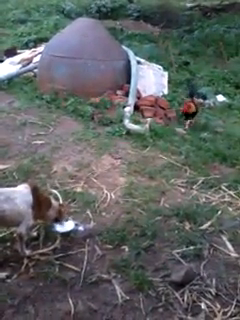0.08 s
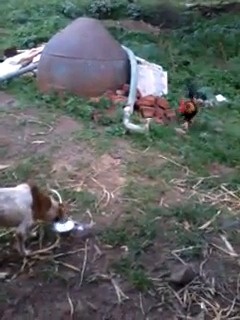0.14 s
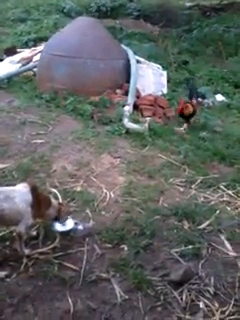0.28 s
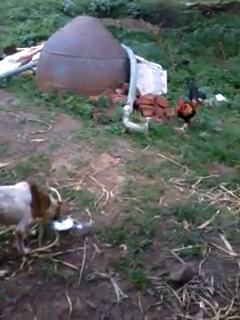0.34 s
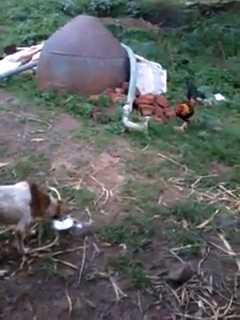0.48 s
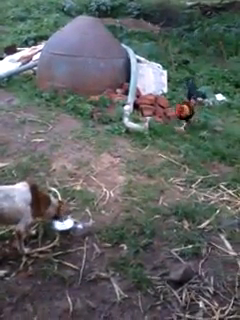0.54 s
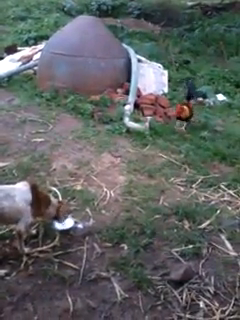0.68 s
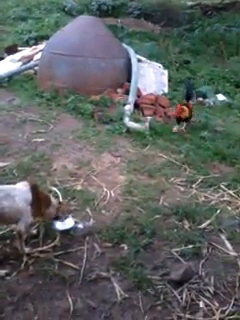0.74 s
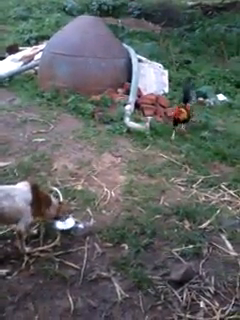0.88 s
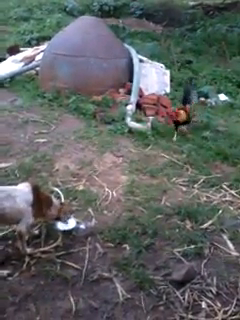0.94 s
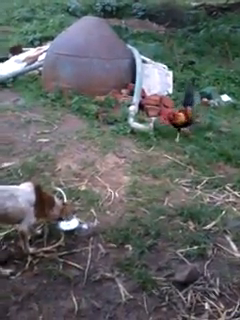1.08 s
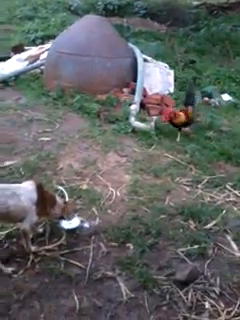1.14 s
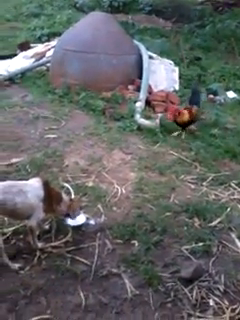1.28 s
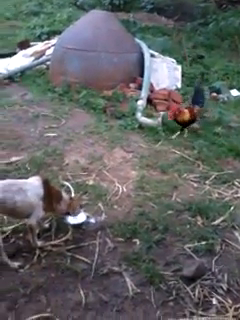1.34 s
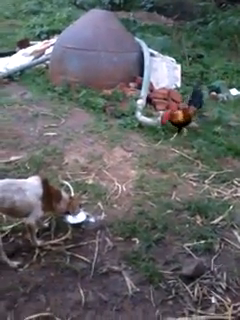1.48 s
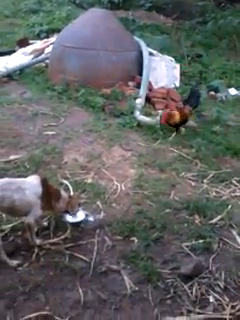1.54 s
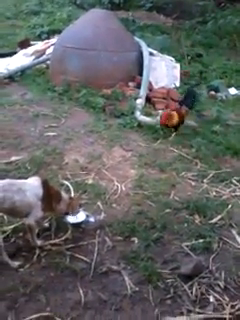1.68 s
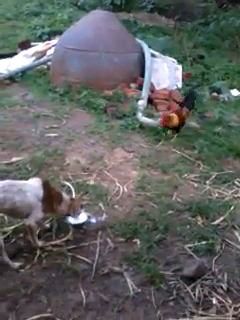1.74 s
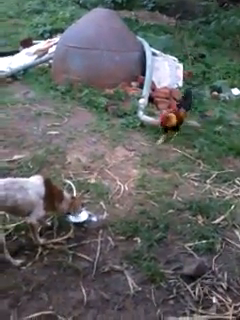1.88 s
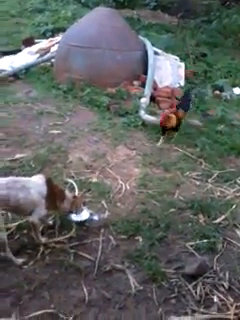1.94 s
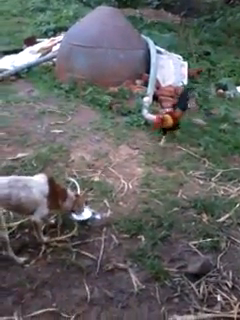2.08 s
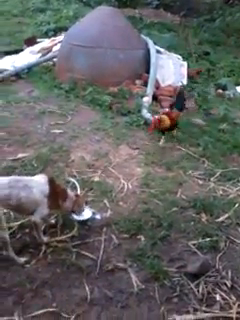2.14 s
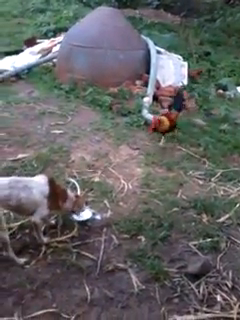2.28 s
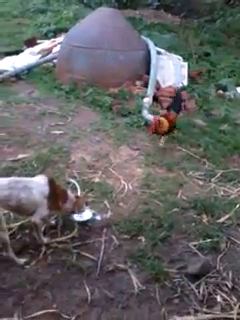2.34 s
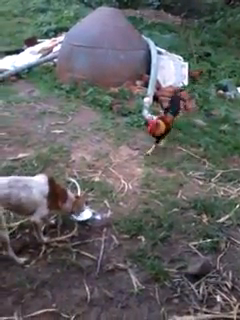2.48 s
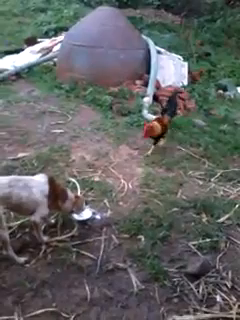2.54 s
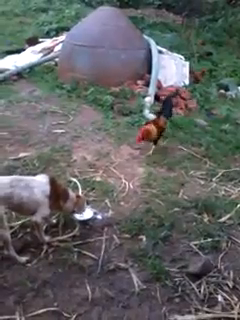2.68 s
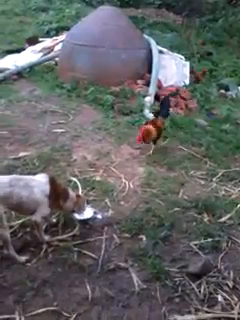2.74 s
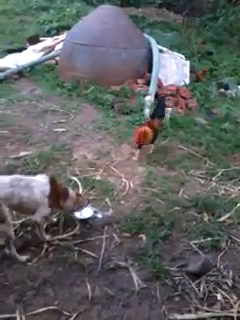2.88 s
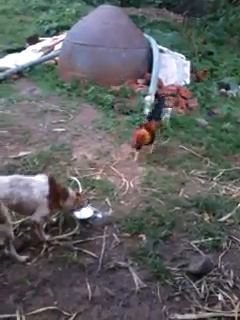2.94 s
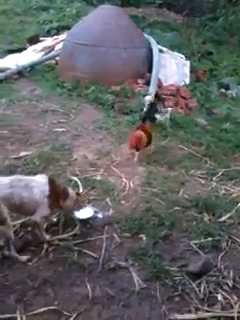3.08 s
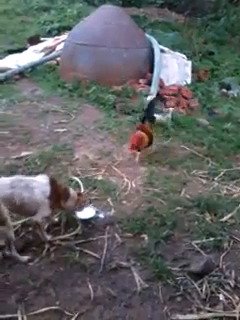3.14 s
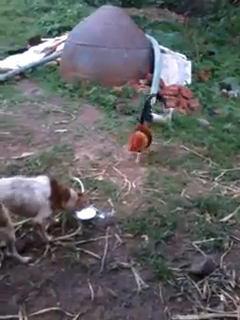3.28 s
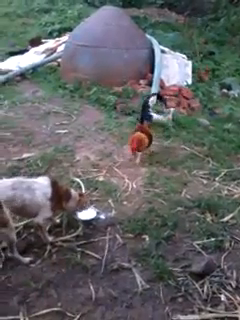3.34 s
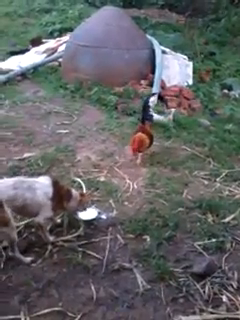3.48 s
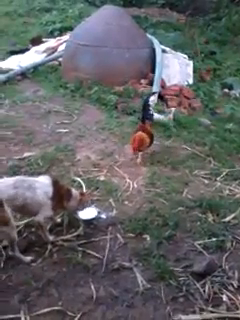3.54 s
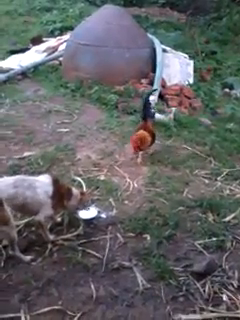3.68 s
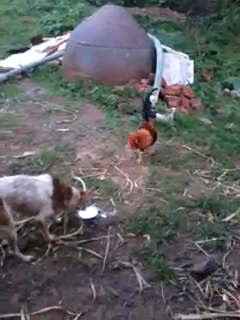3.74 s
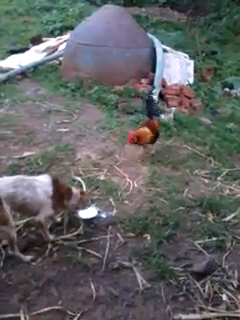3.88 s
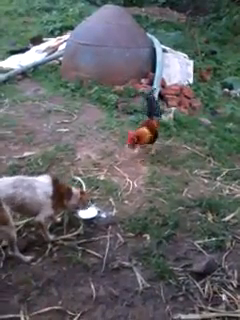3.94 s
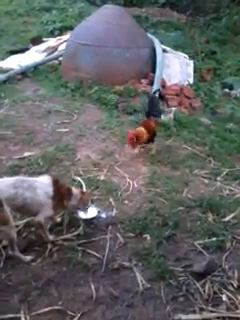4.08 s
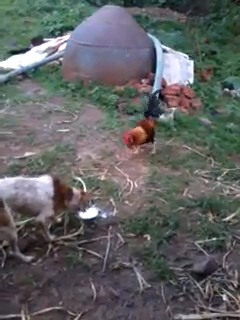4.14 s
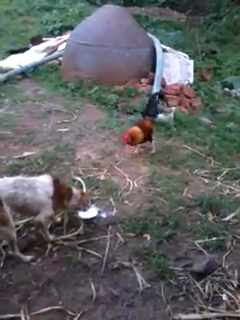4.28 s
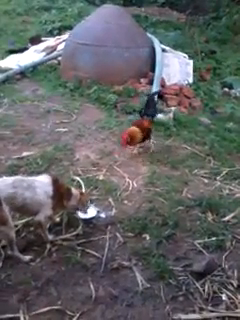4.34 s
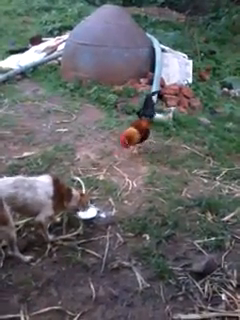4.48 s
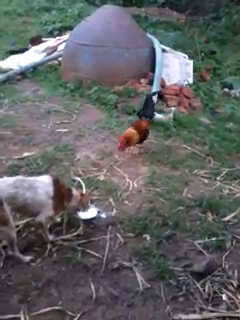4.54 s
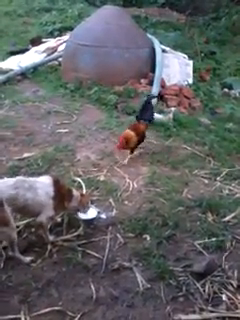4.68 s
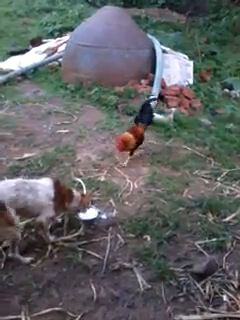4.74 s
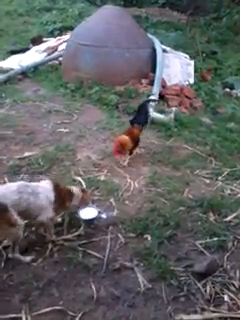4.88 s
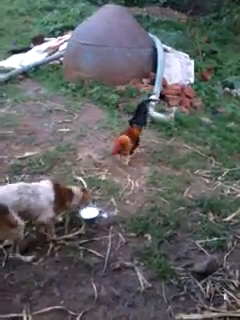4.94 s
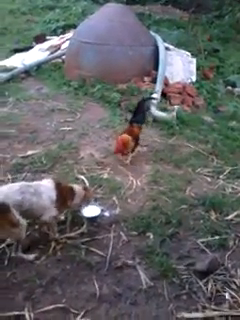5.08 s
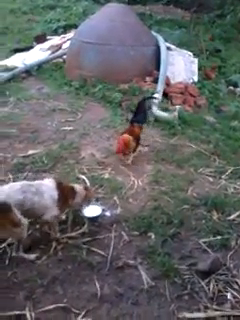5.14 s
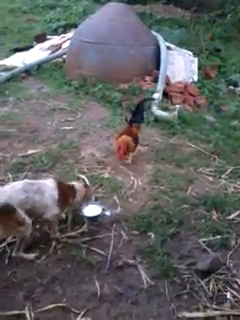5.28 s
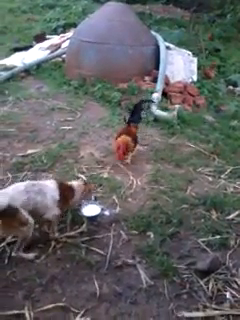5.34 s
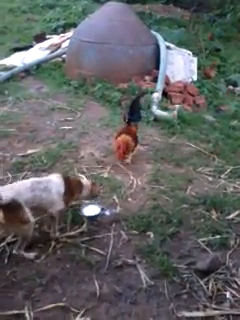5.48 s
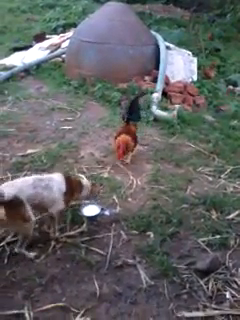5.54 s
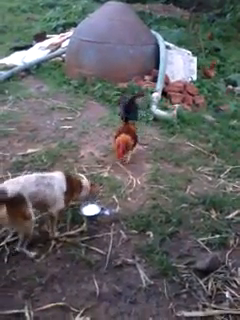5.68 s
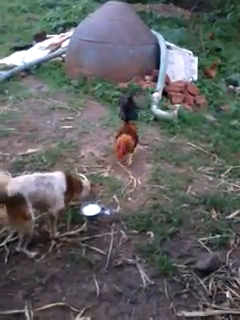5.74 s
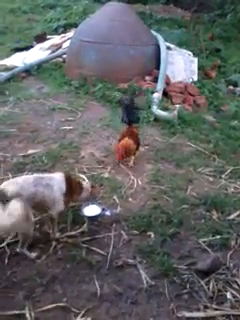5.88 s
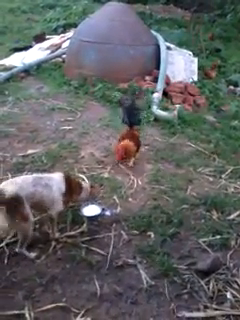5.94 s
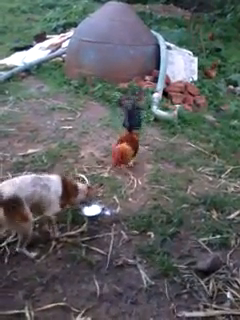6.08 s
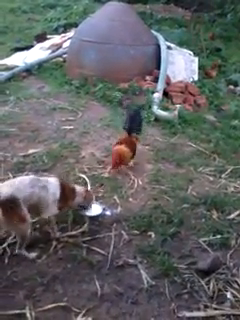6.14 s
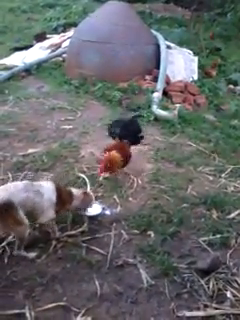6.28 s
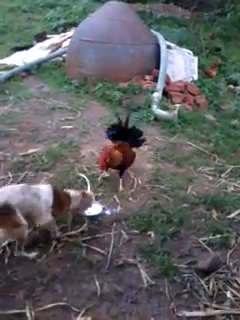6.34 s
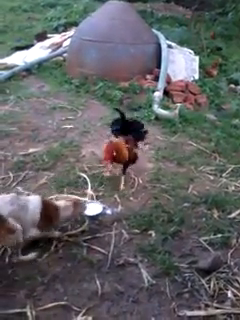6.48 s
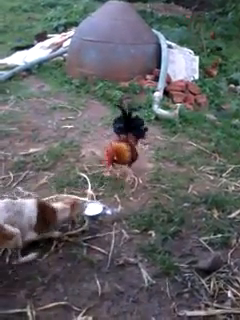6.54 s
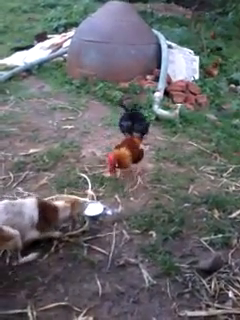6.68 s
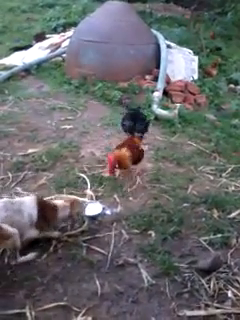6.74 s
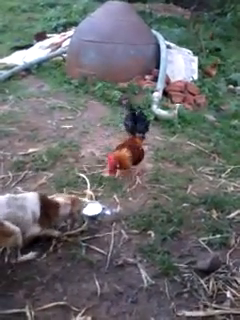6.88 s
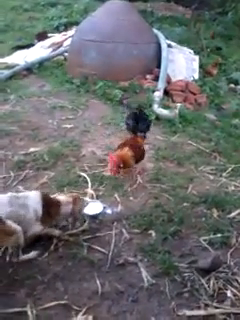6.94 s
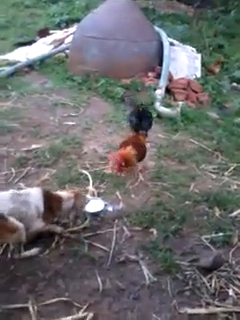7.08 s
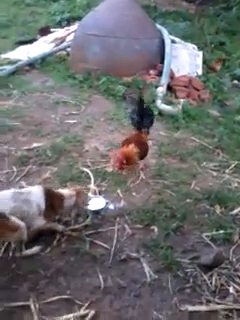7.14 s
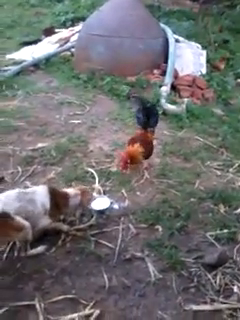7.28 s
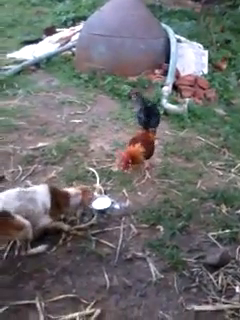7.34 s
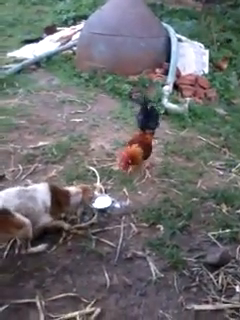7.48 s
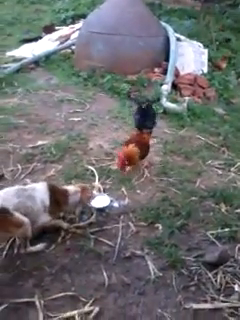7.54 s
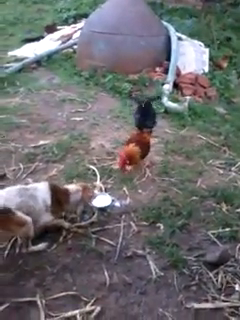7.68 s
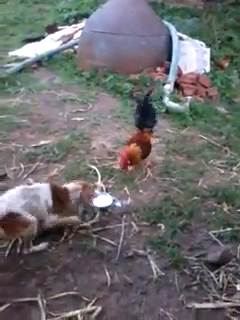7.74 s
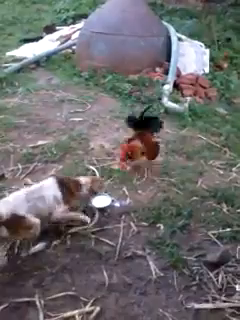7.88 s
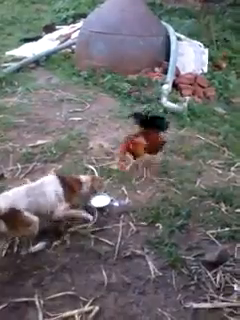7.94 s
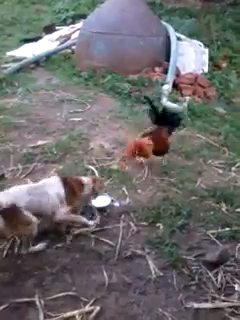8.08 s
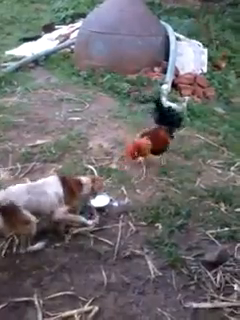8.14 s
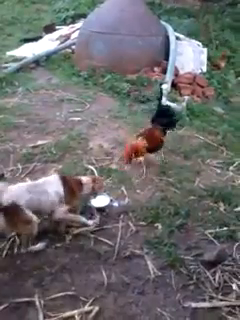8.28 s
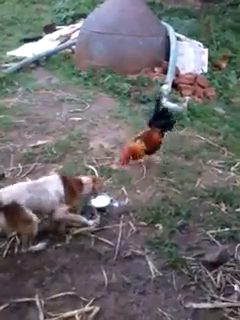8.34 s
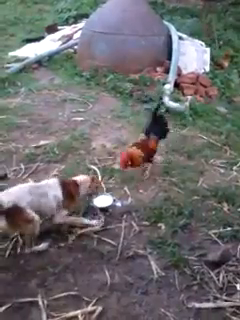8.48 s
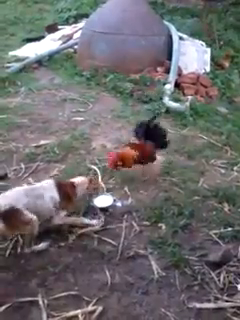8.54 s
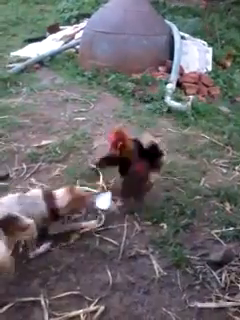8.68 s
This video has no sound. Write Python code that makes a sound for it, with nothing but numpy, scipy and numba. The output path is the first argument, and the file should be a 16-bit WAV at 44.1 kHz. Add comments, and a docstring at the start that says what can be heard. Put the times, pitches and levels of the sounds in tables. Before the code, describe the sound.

A small dog growls in rattling bouts over its food bowl, then gives seven short sharp barks that distort in a quiet open yard.

```python
"""A small dog growls in short rattling bouts, hisses softly, snarls and gives seven sharp barks.
Growls and barks are uneven pulses of the voice, broken up by a rattle and coloured by throat and mouth.
Hisses and the long snarl are noise in moving resonances; crunches are tiny cracks, sharp pulses ring.
A faint hush lies beneath. The open yard answers with short dull echoes and one far one,
and the barks overload the input."""
import sys
import numpy as np
from scipy import signal
from scipy.fft import rfft, irfft
from scipy.io import wavfile
from scipy.ndimage import uniform_filter1d, map_coordinates
from numba import njit

SR = 44100
rng = np.random.default_rng(int(sys.argv[2]) if len(sys.argv) > 2 else 0)


def transcribe(u):
    """Save the signal u as a 16-bit wav file named by the first command-line argument.

    u: samples, shape (n,) or (channels, n), limited to [-1, 1]; the rate is SR.
    q: integer samples, one column per channel.
    """
    v = np.clip(np.atleast_2d(u).T, -1, 1)
    q = np.round(v * 32767).astype(np.int16)
    wavfile.write(sys.argv[1], SR, q)


N = 383669


def from_db(db):
    """Turn decibels into gain."""
    return 10 ** (np.asarray(db) / 20)


def rms_one(x):
    """Scale to an average strength (rms) of 1."""
    return x / np.sqrt(np.mean(x ** 2) + 1e-20)


def evened(x, window_s):
    """Hold the strength (rms) near 1 from moment to moment."""
    power = np.abs(uniform_filter1d(x * x, max(int(window_s * SR), 8)))
    return x / np.sqrt(power + 1e-12)


def cut(x, hz, kind, order=2):
    """Keep what lies below ("low") or above ("high") a frequency."""
    sos = signal.butter(order, min(hz, .45 * SR), kind, fs=SR, output="sos")
    return signal.sosfilt(sos, x + 1e-18)


def add(out, start_s, x):
    """Mix a sound in at its start time, with softened ends."""
    i = max(int(start_s * SR), 0)
    x = x * signal.windows.tukey(len(x), min(1, SR / 200 / len(x)))
    out[i:i + len(x)] += x[:max(N - i, 0)]


def drift(n, rate):
    """Smooth random wandering, built from random points of spread 1, rate of them a second."""
    at = np.arange(n) * rate / SR
    points = rng.standard_normal(int(at[-1]) + 3)
    return map_coordinates(points, [at], order=3, mode="mirror")


def resonate(x, hz, width_hz):
    """One resonance, with a gain of about 1 at its centre."""
    r = np.exp(-np.pi * width_hz / SR)
    feed = np.array([1, 0, -1]) * (1 - r * r) / 2
    return signal.lfilter(feed, [1, -2 * r * np.cos(2 * np.pi * hz / SR), r * r], x)


@njit
def glide(x, hz, width_hz):
    """A resonance whose centre moves."""
    r = np.exp(-np.pi * width_hz / SR)
    y = np.zeros(len(x))
    for i in range(2, len(x)):
        fed = (1 - r * r) / 2 * (x[i] - x[i - 2])
        y[i] = fed + 2 * r * np.cos(2 * np.pi * hz[i] / SR) * y[i - 1] - r * r * y[i - 2]
    return y


def glide_twice(x, hz, width_hz):
    """A moving resonance passed twice, so that less gets through away from its centre."""
    return glide(glide(x, hz, width_hz), hz, width_hz)


def body(x, modes):
    """Resonances side by side, each passed twice so that the valleys between them stay dark."""
    return sum(from_db(db) * resonate(resonate(x, hz, width), hz, width) for hz, width, db in modes)


def air():
    """Still outdoor air: a faint, nearly even hush made of coloured noise."""
    # colour of the hush: f/Hz, level/dB
    hush_colour = [(25, -5), (55, -3), (100, -26), (200, -6.5), (350, 2.5), (600, 2), (1000, 0), (1400, -8),
                   (2600, -9.5), (3300, -14), (7000, -19)]
    hz, db = np.transpose(hush_colour)
    bins = np.maximum(np.arange(N // 2 + 1) * SR / N, 1)
    colour = from_db(np.interp(np.log(bins), np.log(hz), db))
    hush = rms_one(irfft(rfft(rng.standard_normal(N)) * colour, N))
    return from_db(-52.5) * hush * from_db(0.55 * drift(N, 3.1))


def crunches():
    """Dry stalks and food: each crunch is a tight cluster of tiny cracks that builds up and breaks off."""
    # crunches: t/s, peak level/dB, time until it dies away/s, top f/Hz
    crunch_table = [(0.242, -32, 0.0077, 2650), (1.398, -32.5, 0.013, 5100), (1.446, -23, 0.014, 7000),
                    (1.507, -26, 0.013, 7000), (2.191, -38, 0.0042, 4000), (2.209, -19.5, 0.0144, 6860),
                    (3.399, -34, 0.0091, 4950), (4.26, -33, 0.0025, 2630), (4.387, -35.5, 0.004, 2270),
                    (7.3, -28, 0.006, 2830), (7.394, -18, 0.0058, 5130), (8.195, -34, 0.019, 3050),
                    (7.823, -37.5, 0.0012, 3080)]
    # what the cracks ring with: f/Hz, width/Hz, level/dB
    crunch_modes = [(650, 2100, 38.5), (1690, 710, 17), (2360, 820, 30.5), (4820, 3000, -48)]
    cracks_per_s, build_s, die_s = 3500, 0.0068, 0.0019
    out = np.zeros(N)
    t = np.arange(SR // 20) / SR
    for s, peak_db, length_s, top_hz in crunch_table:
        cracks = rng.standard_normal(len(t)) * (rng.random(len(t)) < cracks_per_s / SR)
        cracks *= np.minimum(t / build_s, 1) * np.exp(-np.maximum(t - length_s, 0) / die_s)
        sound = cut(body(cracks, crunch_modes), top_hz, "low", order=4)
        add(out, s - .002, from_db(peak_db) * sound / np.abs(sound).max())
    return out


def sharp_pulses():
    """Single sharp pulses and clicks, several of them strong slaps of the growl, ring briefly."""
    # pulses: t/s, peak level/dB
    pulse_table = [(0.241, -42), (0.764, -40), (1.139, -31.5), (1.452, -28.5), (1.507, -28), (1.853, -19.5),
                   (2.26, -36), (2.298, -36.5), (2.345, -34), (2.449, -29), (3.43, -32), (3.573, -21.5),
                   (3.6, -25), (3.971, -33.5), (4.165, -30.5), (7.146, -29.5), (7.303, -29), (7.395, -15),
                   (7.894, -35.5), (8.279, -25)]
    # what the pulses ring with: f/Hz, width/Hz, level/dB
    pulse_modes = [(614, 306, 9), (941, 110, 8), (2500, 870, -37)]
    pulses = np.zeros(N)
    for s, peak_db in pulse_table:
        pulses[int(s * SR)] = from_db(peak_db)
    one = body(signal.unit_impulse(SR // 20), pulse_modes)
    return body(pulses + 1e-18, pulse_modes) / np.abs(one).max()


def folds(pitch_hz, jitter, shimmer_db, uneven, breath):
    """Vocal folds: unsteady pulses, every third one stronger, with a puff of air in each cycle."""
    n = len(pitch_hz)
    cycles = np.cumsum(pitch_hz * (1 + jitter * drift(n, 350))) / SR
    closing = np.diff(np.floor(cycles), prepend=0)
    strength = from_db(shimmer_db * drift(n, 397.5))
    strength = strength * (1 + uneven * np.cos(2 * np.pi * np.floor(cycles) / 3))
    puffs = rng.standard_normal(n) * (1 + np.cos(2 * np.pi * cycles))
    return rms_one(closing * strength) + breath * rms_one(puffs)


def rattle(n, per_s, scatter, decay_s, depth):
    """Loose throat tissue slaps at uneven intervals; each slap lets a dying burst of voice through."""
    beats = np.cumsum(per_s * np.exp(scatter * drift(n, 44.98))) / SR + rng.random()
    slaps = np.diff(np.floor(beats), prepend=0) * from_db(3 * drift(n, 90))
    bursts = signal.lfilter([1], [1, -np.exp(-1 / (decay_s * SR))], slaps)
    bursts = cut(bursts, 260, "low")  # rounds off the onsets
    depth = np.clip(depth, 0, .98)
    return 1 - depth + depth * bursts


def arch(swell_s, fade_s):
    """A rounded swell and fade: time from its peak, and effort in dB under that peak."""
    depth_db, flatness = 22, 2.3  # depth at the ends; a higher exponent flattens the top
    t = np.arange(-swell_s, fade_s, 1 / SR)
    return t, -depth_db * np.abs(t / np.where(t < 0, swell_s, fade_s)) ** flatness


def growls():
    """A rattling voice hums in the chest while the lips are closed and rasps as they part."""
    # growls: start t/s, swell/s, fade/s, pitch f/Hz, chest level/dB, open-mouth level/dB,
    # jaw resonance f/Hz, rattle (0-1); pitch, levels and jaw are those at the peak
    growl_table = [ (0.41, 0.15, 0.16, 326, -38.5, -43.5, 725, 0.98),
                   (0.905, 0.018, 0.3, 313, -38.5, -50, 770, 1),
                   (1.031, 0.23, 0.083, 320.5, -32.5, -44, 820, 0.86),
                   (1.631, 0.048, 0.14, 302, -40.5, -80, 600, 1),
                   (1.719, .12, 0.14, 315.6, -30, -35, 740, 0.75),
                   (1.839, 0.021, 0.018, 321, -48, -30, 740, 0.65),
                   (1.95, 0.06, 0.034, 321.7, -25.5, -26, 747, 0.37),
                   (2.04, 0.027, 0.039, 320, -53, -42.5, 694, 0.4),
                   (2.123, 0.044, 0.014, 278, -45.5, -46, 590, 0.85),
                   (2.405, 0.046, 0.083, 298.7, -31.5, -33.5, 674, 0.71),
                   (2.731, 0.044, 0.061, 301, -46, -73, 564, 0.78),
                   (3.25, 0.056, 0.088, 213.5, -51, -36, 674, 0.04),
                   (3.456, 0.028, 0.16, 292, -41, -50, 553, 1),
                   (3.535, 0.024, 0.026, 300, -33, -36.5, 560, 0.7),
                   (3.54, 0.073, 0.15, 325.3, -33, -27.5, 694, 0.97),
                   (3.657, 0.022, 0.06, 313.3, -31, -41, 680, 0.3),
                   (3.74, 0.068, 0.029, 285, -35, -35, 583, 1),
                   (3.859, 0.036, 0.079, 200.3, -43, -42, 535, 0.5),
                   (3.97, 0.047, 0.11, 303, -39.5, -49.5, 560, 0.92),
                   (4.114, 0.027, 0.067, 325, -36, -54, 573, 0.34),
                   (4.256, 0.034, 0.14, 315.3, -33, -44.5, 770, 0.67),
                   (4.385, 0.026, 0.049, 326, -42, -80, 560, 0.38),
                   (4.478, 0.035, 0.043, 341, -37.5, -49.5, 520, 1),
                   (4.586, 0.037, 0.044, 252, -43, -44.5, 820, 0.82),
                   (5.20, .056, 0.088, 191.4, -50, -39, 576, 0.4),
                   (5.81, 0.066, 0.063, 180.8, -50, -39.5, 707, 0.72),
                   (6.78, 0.047, 0.21, 323.2, -34, -28.5, 680, 0.98),
                   (7.055, 0.022, 0.05, 298, -35, -49, 520, 1),
                   (7.297, .025, .07, 300.4, -38, -32, 563, 0.96),
                   (7.31, .12, 0.086, 346, -29, -25.5, 660, 0.92),
                   (7.45, 0.0416, 0.169, 306.4, -31.5, -46, 557, 0.57),
                   (7.72, 0.017, 0.19, 356.4, -46, -56, 558, 0.52),
                   (8.264, 0.028, 0.088, 303.5, -33.5, -30, 623, 0.88),
                   (8.32, 0.033, 0.068, 343, -30.5, -42, 527, 0.66),
                   (8.385, 0.048, 0.071, 240.4, -40.5, -31.5, 484, 0.27),
                   (8.426, 0.059, 0.1, 351.5, -29, -29.5, 650, 0.75),
                   (8.50, 0.088, .06, 337, -28, -25, 715, 0.49)]
    # resonances of the chest, the mouth, and faint ones between the teeth: f/Hz, width/Hz, level/dB
    chest_modes = [(266, 220, 0)]
    mouth_modes = [(720, 420, -12.5), (964, 240, -9.5)]
    teeth_modes = [(1770, 270, -26.5), (2460, 710, -31)]
    # effort opens the mouth (dB per dB) and lifts the pitch and the jaw resonance
    mouth_follows, pitch_hz_per_db, jaw_hz_per_db = 1.17, 2.5, 6.5
    sag_hz_per_s = 120  # the pitch sinks as the breath runs out
    out = np.zeros(N)
    for start, swell_s, fade_s, top_hz, top_chest_db, top_mouth_db, open_hz, rough in growl_table:
        t, effort_db = arch(swell_s, fade_s)
        n = len(t)
        pitch_hz = top_hz + pitch_hz_per_db * effort_db - sag_hz_per_s * t
        pitch_hz = pitch_hz * (1 + .065 * drift(n, 28))
        chest_db = top_chest_db + effort_db
        mouth_db = top_mouth_db + mouth_follows * effort_db
        tone = folds(pitch_hz, jitter=.09 * rough, shimmer_db=3 * rough,
                     uneven=.6 * rough, breath=.35 * rough)
        slap_depth = .95 * np.sqrt(np.clip(rough, 0, 1))
        slaps = rattle(n, per_s=75, scatter=.3, decay_s=.005, depth=slap_depth)
        slapped = tone * slaps
        # the chest passes the basic tone, throbbing with each slap, and the low part of the rattle
        hum_hz = pitch_hz * (1 + .12 * rough * drift(n, 110))
        hum = np.sin(2 * np.pi * np.cumsum(hum_hz) / SR) * rms_one(slaps + .35)
        rumble = evened(body(slapped, chest_modes), window_s=0.034)
        chest = cut(.95 * rough * rumble + hum, 135, "high", order=4)
        chest = cut(chest, 620, "low", order=4)
        # the jaw drops as the growl swells, lifting the lowest mouth resonance
        jaw_hz = (open_hz + jaw_hz_per_db * effort_db) * np.exp(.06 * drift(n, 25))
        mouth = glide_twice(slapped, jaw_hz, 220) + body(slapped, mouth_modes)
        mouth = cut(cut(mouth, 410, "high", order=4), 1012, "low", order=8)
        mouth = mouth + body(slapped, teeth_modes)
        voice = from_db(chest_db) * evened(chest, window_s=0.027)
        voice = voice + from_db(mouth_db) * evened(mouth, window_s=0.019)
        add(out, start, voice)
    return out


def soft_hisses():
    """Soft hisses: breaths, airy edges of growls and a faint ring after a bark, all resonant noise."""
    # hisses: start t/s, swell/s, fade/s, peak resonance f/Hz, peak level/dB, rush level over hiss/dB
    hiss_table = [ (0.73, 0.025, 0.04, 1365, -55, 10.5), (1.10, 0.052, 0.19, 2480, -59.5, -11),
                  (2.06, 0.046, 0.024, 2670, -49.5, 3.5), (2.467, 0.044, 0.0099, 2430, -48.5, -16),
                  (2.585, 0.048, 0.024, 2480, -52.5, 5), (2.66, 0.039, 0.065, 2480, -58.5, 11),
                  (3.23, 0.069, 0.088, 2270, -53, 14), (3.869, 0.036, 0.051, 2900, -57, 7),
                  (4.52, 0.082, 0.081, 2610, -57.5, 13), (5.161, 0.048, 0.11, 2290, -49.5, 4.5),
                  (5.23, 0.06, 0.19, 1900, -59, -7), (5.701, 0.084, 0.17, 2640, -48, 12),
                  (6.40, 0.058, 0.11, 2760, -51.5, 7), (7.019, 0.038, 0.058, 2290, -50, 6),
                  (8.109, 0.043, 0.21, 2200, -46, 8)]
    hz_per_db = 19.5  # the resonance rises and falls with the level
    out = np.zeros(N)
    for start, swell_s, fade_s, top_hz, level_db, rush_db in hiss_table:
        t, swell_db = arch(swell_s, fade_s)
        hz = top_hz + hz_per_db * swell_db
        noise = rng.standard_normal(len(t)) * from_db(2.5 * drift(len(t), 120))
        # a main band, a weaker one an octave up, and a dull rush
        whistle = glide_twice(noise, hz, 420)
        hiss = whistle + from_db(-19.5) * glide(noise, 2 * hz, 800)
        rush = body(noise, [(490, 580, -5.5), (990, 150, -8.0)])
        mix = rms_one(hiss) + from_db(rush_db) * rms_one(rush)
        add(out, start, from_db(level_db + swell_db) * mix)
    return out


def bark_gesture(attack_s, hold_s, release_s):
    """Effort, dulling and muffling through one bark, all in dB."""
    # effort rises, sags slowly from the hold on, and falls in the release
    rise_db, sag_db_per_s, fall_db = 46, 37.5, 27
    rise_curve, fall_curve = 3.54, 0.7  # exponents: both start fast and then ease off
    # the upper resonances are weaker at the bark's ends and also follow effort (dB per dB)
    dull_ends_db, brightness_follows = 7.5, 0.48
    muffle_db = 17  # reached at the end of the release as the jaw closes
    t = np.arange(0, attack_s + hold_s + release_s, 1 / SR)
    opening = np.maximum(1 - t / attack_s, 0)
    held_s = np.maximum(t - attack_s, 0)
    released = (np.maximum(held_s - hold_s, 0) / release_s) ** fall_curve
    effort_db = -rise_db * opening ** rise_curve - sag_db_per_s * held_s - fall_db * released
    middle = np.sin(np.pi * np.minimum(t / (attack_s + hold_s + release_s / 2), 1))
    dull_db = dull_ends_db * (1 - middle) - brightness_follows * effort_db
    return effort_db, dull_db, muffle_db * released


def wandering(x, hz, width_hz, db):
    """A throat resonance whose centre never holds still."""
    centre_hz = hz * np.exp(0.05 * drift(len(x), 52.3))
    return from_db(db) * glide_twice(x, centre_hz, width_hz)


def dip(x, hz, width_hz):
    """The throat's side cavities swallow a narrow band."""
    return signal.lfilter(*signal.iirnotch(hz, hz / width_hz, fs=SR), x)


def barks():
    """A clear voice and a ragged one sound together through a throat whose resonances follow the jaw."""
    # barks: start t/s, attack/s, hold/s, release/s, level/dB, brightness/dB, harshness (0-1)
    bark_table = [ (2.987, 0.046, 0.044, 0.069, -1, -5.5, 0.67), (4.885, .046, 0.032, 0.1, 0, 0.5, 0.53),
                  (5.505, 0.026, 0.08, 0.084, 1.5, 3, .9), (6.144, 0.066, 0.042, .12, 0.5, 6, 0.72),
                  (6.725, .04, 0.018, 0.097, -5.5, -6.5, 0.57),
                  (7.978, 0.021, 0.033, 0.089, -1, 19.5, 0.78),
                  (8.566, 0.058, 0.0036, 0.173, -6.5, 5, 0.76)]
    # the voice scoops, jumps and sinks while the jaw moves: t/s, pitch f/Hz, jaw resonance f/Hz
    voice_path = [ (2.985, 341, 400), (3.001, 504.8, 525), (3.035, 712.2, 708), (3.044, 530.4, 703),
                  (3.069, 544.4, 680), (3.089, 584, 580), (3.13, 482, 560), (4.885, 371.6, 750),
                  (4.908, 448.9, 835), (4.923, 674.7, 690), (4.94, 574, 618), (4.975, 518.2, 546),
                  (5.031, 534, 563), (5.504, 870.7, 875), (5.538, 829.5, 854), (5.547, 573.3, 775),
                  (5.566, 595, 842), (5.577, 781.7, 853), (5.607, 731, 738), (5.66, 700, 680),
                  (6.15, 359, 700), (6.179, 501.8, 877), (6.186, 781, 792), (6.206, 760, 795),
                  (6.214, 555, 717), (6.245, 551.4, 600), (6.289, 512, 518), (6.726, 311.6, 490),
                  (6.758, 428.3, 650), (6.781, 358.2, 694), (6.85, 329, 637), (7.981, 815.5, 810),
                  (7.993, 903, 895), (8.035, 843.4, 880), (8.046, 525, 820), (8.11, 493, 587),
                  (8.565, 329, 820), (8.607, 362.2, 698), (8.65, 301.6, 550), (8.70, 310, 600)]
    # upper resonances of the open throat: f/Hz, width/Hz, level/dB
    throat_modes = [(1008.5, 164, -9.5), (1634, 355, -17), (2373, 450, -22), (2927, 300, -30),
                    (4590, 1000, -38)]
    # instants when the voice cracks up into its upper resonances: t/s, half length/s, lift/dB
    shriek_table = [(3.037, .008, 6), (5.525, 0.0054, 9.5), (5.597, 0.011, 5.5), (5.625, 0.0068, 3),
                    (6.246, 0.013, 5.5), (6.754, 0.0053, 10), (8.003, 0.0024, 10), (8.025, 0.0032, 10),
                    (8.037, 0.0034, 9), (8.608, .006, 2)]
    # the ragged voice keeps one steady middle pitch and takes over as the clear one fades in the release
    ragged_hz, ragged_gain, clear_fade_db = 520, 1.45, -6
    jaw_middle_hz, throat_follows = 757, 0.22  # the throat follows the jaw about its middle (exponent)
    # the balance of low and high resonances wanders; harshness scales how far
    break_db, breaks_per_s = 5, 131.2
    rasp_db = -38.5  # against the voice in the lowest resonances, before effort changes it
    out = np.zeros(N)
    s, *controls = np.transpose(voice_path)
    for start, attack_s, hold_s, release_s, level_db, bright_db, harsh in bark_table:
        effort_db, dull_db, muffle_db = bark_gesture(attack_s, hold_s, release_s)
        n = len(effort_db)
        t = start + np.arange(n) / SR
        pitch_hz, jaw_hz = [np.interp(t, s, control) for control in controls]
        clear = folds(pitch_hz, jitter=.036, shimmer_db=3, uneven=.3, breath=0)
        ragged = folds(np.full(n, ragged_hz), jitter=.13, shimmer_db=4, uneven=.8, breath=.6)
        fading = np.clip((t - start - attack_s - hold_s) / release_s, 0, 1)
        source = from_db(clear_fade_db * fading) * clear
        source = source + ragged_gain * np.clip(harsh, .4, 1) * ragged
        grain = rattle(n, per_s=130, scatter=.3, decay_s=.005, depth=.6)

        jaw = glide(glide(source, jaw_hz, 340), jaw_hz, 300) + body(source, [(524, 124, -9.5)])
        stretch = (jaw_hz / jaw_middle_hz) ** throat_follows
        second, third, *upper = [wandering(source, hz * stretch, width_hz, db)
                                 for hz, width_hz, db in throat_modes]
        lift_db = harsh * break_db * drift(n, breaks_per_s)
        for at, half_s, db in shriek_table:
            lift_db = lift_db + db * np.exp(-((t - at) / half_s) ** 2)
        # turbulent air rasps along with the effort
        turbulence = rms_one(cut(rng.standard_normal(n), 5000, "low"))
        rasp = from_db(rasp_db) * np.std(jaw) * from_db(effort_db / 2) * turbulence
        # the closing jaw muffles the second resonance fully and the highest ones half as much
        high = third + from_db(-muffle_db / 2) * sum(upper)
        high = from_db(bright_db - dull_db + lift_db) * high
        voice = jaw + from_db(-muffle_db) * second + high + rasp
        voice = cut(evened(voice, window_s=0.0053) * grain, 299, "high", order=4)
        voice = dip(voice, hz=1308, width_hz=232)
        add(out, start, from_db(level_db + effort_db) * evened(voice, window_s=.02))
    return out


def long_snarl():
    """A long airy whistle past the teeth, with a fainter one near the octave and a dull throat rush."""
    # the resonance mostly climbs as the lips draw back: t/s, resonance f/Hz, whistle level/dB
    snarl_path = [(6.84, 1900, -71), (6.951, 1800, -49), (7.03, 1850, -54), (7.13, 1790, -56),
                  (7.17, 1900, -47.5), (7.20, 2000, -45), (7.26, 2100, -45), (7.30, 2100, -45.5),
                  (7.34, 2170, -38.5), (7.44, 2200, -45), (7.49, 2060, -69)]
    s, hz, db = np.transpose(snarl_path)
    t = np.arange(s[0], s[-1], 1 / SR)
    centre_hz = np.interp(t, s, hz) * (1 + .015 * drift(len(t), 30))
    breath = rng.standard_normal(len(t)) * from_db(1.5 * drift(len(t), 70))
    whistle = rms_one(glide_twice(breath, centre_hz, 380))
    octave = rms_one(glide_twice(breath, 1.92 * centre_hz, 850))
    rush = rms_one(body(breath, [(550, 360, -4), (977, 140, -3.5)]))
    mix = whistle + from_db(-13.5) * octave + from_db(1.0) * rush
    out = np.zeros(N)
    add(out, s[0], from_db(np.interp(t, s, db)) * mix)
    return out


def yard(x):
    """Ground, near walls and far trees scatter the sound in dull, dying showers of echoes."""
    # echo showers: delay/s, time to fall by 60 dB/s, level before dulling/dB, top f/Hz
    echo_table = [(.004, 0.053, -13, 3620), (0.023, 0.33, -15, 1550), (0.031, 0.48, -29.5, 6230),
                  (0.091, 0.76, -41.5, 1098), (.14, .12, -33.5, 900), (0.273, 0.3, -48, 913)]
    response = np.zeros(SR)
    t = np.arange(SR) / SR
    for delay_s, t60, db, top_hz in echo_table:
        age = np.maximum(t - delay_s, 0)
        shower = rng.standard_normal(SR) * (t > delay_s) * from_db(-60 * age / t60)
        response += from_db(db) * cut(shower / np.linalg.norm(shower), top_hz, "low")
    return signal.fftconvolve(x, response)[:N]


def scene():
    """The dog and the small noises at its bowl, in the open yard."""
    dog = barks() + growls() + soft_hisses() + long_snarl() + crunches() + sharp_pulses()
    return (dog + yard(dog) + air())[None]


def record(dry):
    """The input overloads on loud sound; its band is limited, overshoot squeezed and the top cut."""
    ceiling, knee = .72, 6
    lopsided = 0.043  # an offset makes the overload uneven
    band_top_hz, cutoff_hz = 7250, 15850
    pushed = dry + lopsided
    x = pushed / (1 + np.abs(pushed / ceiling) ** knee) ** (1 / knee) - lopsided
    x = signal.sosfilt(signal.ellip(8, .3, 70, band_top_hz, fs=SR, output="sos"), x)
    overshoot = x - np.clip(x, -.69, .69)
    x = x - 0.81 * overshoot
    return signal.sosfilt(signal.ellip(10, .2, 80, cutoff_hz, fs=SR, output="sos"), x)


dry = scene()
out = record(dry)
transcribe(out)
```